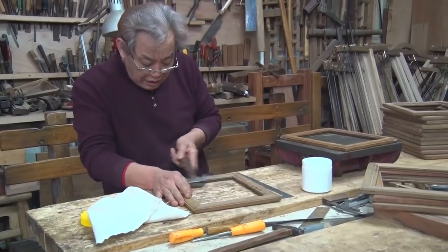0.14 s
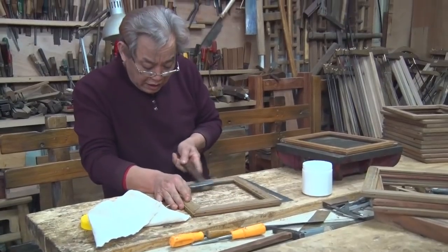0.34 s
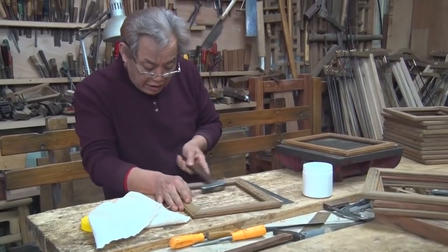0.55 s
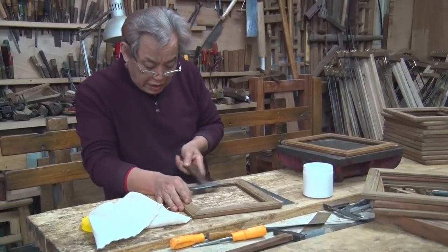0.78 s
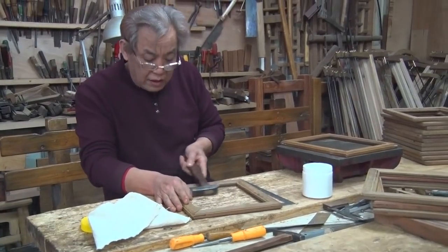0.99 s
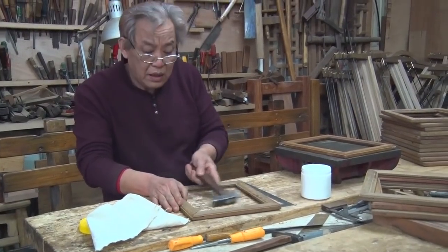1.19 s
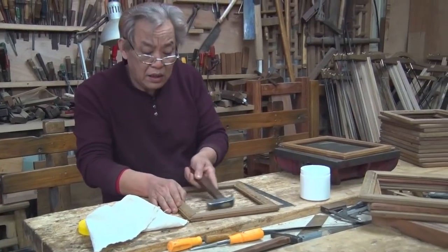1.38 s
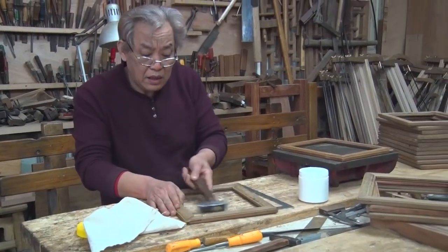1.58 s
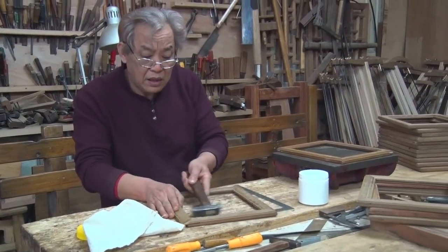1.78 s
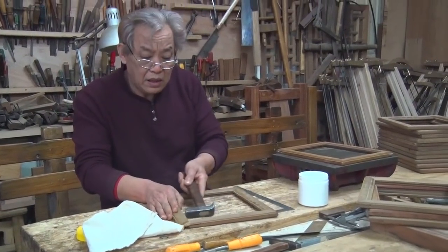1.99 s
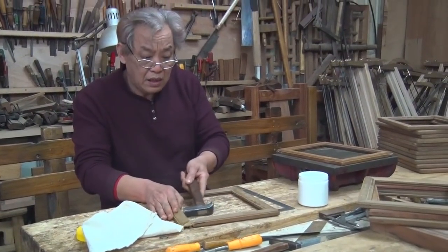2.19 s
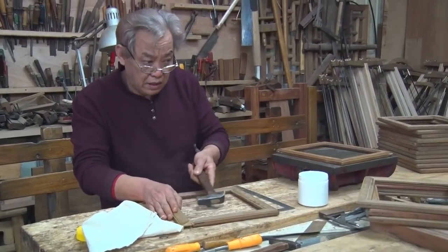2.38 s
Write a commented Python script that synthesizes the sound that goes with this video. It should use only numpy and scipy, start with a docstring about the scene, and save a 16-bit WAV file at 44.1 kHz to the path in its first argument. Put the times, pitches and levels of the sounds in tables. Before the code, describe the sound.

Quick, sharp hammer taps on wood pause briefly as the frame is shifted, then carry on

```python
"""A small hammer taps the corner joint of a wooden frame on a bench, about 4.5 times a second: crack plus frame modes.
A low rumble of the bench and faint room air, both shaped noise, run underneath from the start.
Dull knocks and brief scuffs fall between the taps: noise bursts, the knocks with bench modes.
Halfway the frame is shifted, knocks and clacks on the bench, and the taps go on at another spot.
A cluttered workshop returns each blow as echoes, scatter and tail to a near-mono microphone."""
import sys
import numpy as np
from scipy import signal
from scipy.fft import rfft, irfft
from scipy.io import wavfile
from scipy.ndimage import uniform_filter1d

SR = 44100
rng = np.random.default_rng(int(sys.argv[2]) if len(sys.argv) > 2 else 0)


def generate_wav(signal):
    """Clip the signal to [-1, 1] and save it as 16-bit WAV at the path in sys.argv[1]."""
    frames = np.transpose(np.atleast_2d(signal))
    scaled = np.clip(frames, -1, 1) * 32767
    pcm = np.round(scaled).astype(np.int16)
    wavfile.write(sys.argv[1], SR, pcm)


N = 108045

# spectrum of the crack of a hard contact on wood: hz, level_db
CRACK_SPECTRUM = [(80, -8), (170, 11.5), (350, -1.5), (650, 8), (1100, 17), (1750, 15.5), (2800, 13.5),
                  (3600, 13), (4500, 11), (5500, 13.5), (7400, 1.5), (8400, 5), (10200, -3.5), (10900, 1),
                  (11700, -28)]
CRACK_RISE_S = 0.00079  # rise of every contact burst
TAIL_EDGE_HZ = 11100  # band limit of room tails, rumble and air


def amp(db):
    """Decibels to gain."""
    return 10 ** (np.asarray(db) / 20)


def read(points, hz):
    """Table value at hz, interpolated on a log-frequency axis."""
    table_hz, value = np.transpose(points)
    return np.interp(np.log(hz + 1), np.log(table_hz + 1), value)


def add(mix, start_s, sound):
    """Add sound to mix at start_s, which may lie before the start."""
    at = round(start_s * SR)
    sound = sound[:, max(-at, 0):]
    part = mix[:, max(at, 0):][:, :sound.shape[1]]
    part += sound[:, :part.shape[1]]


def colour(x, points, size=4096):
    """Causal minimum-phase filter with the given (hz, db) shape."""
    hz = abs(np.fft.fftfreq(size, 1 / SR))
    log_gain = np.log(amp(read(points, hz)))
    response = np.exp(np.conj(signal.hilbert(log_gain)))
    impulse = np.fft.ifft(response).real[:size // 2]
    return signal.fftconvolve(x, impulse)[:len(x)]


def low_pass(x, edge_hz):
    """Steep linear-phase band limit."""
    fir = signal.firwin(255, edge_hz, window=("kaiser", 7), fs=SR)
    return signal.oaconvolve(x, fir[None], "same", axes=1)


def burst(noise, t60_points, rise_s, even_hz, count=9):
    """Noise that swells and dies band by band; its spectrum is levelled to gain 1 over spans of even_hz."""
    t = np.arange(len(noise)) / SR
    hz = np.fft.rfftfreq(len(noise), 1 / SR)
    centres_hz = np.geomspace(80, 11000, count)
    spectrum = rfft(noise)
    decaying = np.zeros(len(t))
    for centre_hz, pick in zip(centres_hz, np.eye(count)):
        band = irfft(spectrum * read(np.c_[centres_hz, pick], hz), len(t))
        decaying += band * amp(-60 * t / read(t60_points, centre_hz))
    swelling = decaying * (1 - np.exp(-t / rise_s))
    spectrum = rfft(swelling, 2 * len(t))
    span_bins = max(int(2 * even_hz / hz[1]), 1)  # the padded bins are half as wide
    power = uniform_filter1d(abs(spectrum) ** 2, span_bins)
    return irfft(spectrum / np.sqrt(abs(power) + 1e-12))[:len(t)]


def ring(modes, t):
    """Decaying sines from rows of (hz, level_db, t60_s); neighbouring rows start in opposite phase."""
    out = np.zeros(len(t))
    for k, (hz, level_db, t60_s) in enumerate(modes):
        out += (-1) ** k * amp(level_db - 60 * t / t60_s) * np.sin(2 * np.pi * hz * t)
    return out


def workshop(direct, spread, size=24000):
    """Direct sound plus near echoes; spread is convolved with quick scatter and a late tail, both decaying noise."""
    # room: hz, level_db, late_t60_s
    room = np.array([(70, 12, 0.95), (191, 4, 0.3), (500, 6, 0.34), (1043, -5.5, 0.55), (1750, -4, 0.47),
                     (4100, -5, 0.45), (5170, -12, 0.23), (6300, -10, 0.48), (10400, -17, 0.083)])
    # bench and nearby shelves: delay_s, gain
    echoes = [(.0046, 0.18), (.0093, 0.28), (0.015, 0.11)]
    # left-right difference: hz, level_db
    width = [(1200, -25), (5000, -18)]
    early_db, early_t60_s = 1.5, 0.15
    late_db = -4
    delay_s, rise_s = 0.0046, 0.0042

    def tail():
        early = burst(rng.standard_normal(size), [(1000, early_t60_s)], rise_s, even_hz=150)
        late = burst(rng.standard_normal(size), room[:, [0, 2]], rise_s, even_hz=79.5)
        return colour(amp(early_db) * early + amp(late_db) * late, room[:, :2])

    out = np.zeros((2, size + len(direct)))
    mid, side = tail(), tail()
    tails = mid + np.outer([1, -1], colour(side, width))
    reverb = signal.fftconvolve(spread[None], tails, axes=1)
    add(out, delay_s, low_pass(reverb, TAIL_EDGE_HZ))
    add(out, 0, direct[None])
    soft = colour(direct, [(3000, -3.5), (8000, -9)])
    soft = soft + np.outer([-1, 1], 2 * colour(direct, width))
    for echo_s, gain in echoes:
        add(out, echo_s, gain * soft)
    return out


def hammer(size=8192):
    """A tap is a short crack plus the frame's modes, coloured by where and how the head lands; it may rebound."""
    # taps: start_s, level_db, spot (0 first, 1 second), favoured_hz, lift_db, then tone_db at each of tone_hz
    taps = [(-.022, -7.5, 1, 6300, 3, 4, 0.5, 3, 5.5, 4, 0, 3, 2),
            (0.21, -3, 0.019, 1716, 9.2, 12, 3, 5, -0.5, 6.5, 1, 2, 6.5),
            (0.432, 0, 0.0097, 847, 3.8, 4, -4, -1.5, 1.5, 2, 0, -2, 4),
            (0.661, 2, 0.11, 1240, 5.5, -3.5, 3.5, -5, -1, 3, 0, -1, 1.5),
            (0.8766, -1, 0.089, 614, 7.4, -7, 0.5, -5, 2, 3, -0.5, -2, 0),
            (1.2983, -2, 0.87, 1750, 6.8, 5.5, 8.5, -4, 2, -1, -3.5, -1.5, 1.8),
            (1.5223, -0.5, 0.39, 3570, 4.2, 4, 1, -9, 5, -2, -3.5, -2.5, 2),
            (1.7464, -3.5, 0.91, 6350, 7.8, 1.5, 3, -1.5, 3, 2.5, 5.5, -3, 5),
            (1.9675, -2.5, 0.95, 4100, 2.2, 1, -1.5, -3, 0.5, 2.5, 2, 2, 2.5),
            (2.153, -7.5, 0.63, 1375, 7.2, 7.5, -0.5, -1, 0.5, 6.5, 0.5, -2.5, -1.8)]
    tone_hz = [250, 650, 1000, 1500, 2500, 4000, 6300, 9500]
    # frame modes: hz, t60_s, first_spot_db, second_spot_db
    frame = [(449.8, 0.23, -36, -36), (578, 0.06, -36, -26.5), (703.5, 0.078, -21, -27),
             (986, 0.039, -16.5, -38), (1318, 0.19, -36.5, -35), (1375, 0.02, -10, -32),
             (1603, 0.076, -22.5, -25), (1670, 0.032, -37.5, -21), (1832, 0.042, -19.5, -15.5),
             (2130, 0.028, -21, -29), (2325, 0.18, -36.5, -41.5), (2564, 0.15, -29, -51.5),
             (3670, 0.011, -20, -14.5), (4143, 0.038, -34, -18.5), (6300, 0.018, -27, -14.5)]
    # crack decay: hz, t60_s
    crack_t60 = [(300, 0.044), (2000, 0.046), (5000, 0.014), (11000, 0.013)]
    # the head drops back on the wood: start_s, level_db relative to the tap
    rebounds = [(1.5405, -8)]
    lift_octaves = 0.18  # half-width of the favoured resonance
    crack_in_room, ring_in_room_db = 0.45, -11

    out, t = np.zeros((2, N)), np.arange(size) / SR
    hz = np.geomspace(20, SR / 2, num=300)
    click = colour(1. * (t == 0), CRACK_SPECTRUM)
    for start_s, level_db, spot, favoured_hz, lift_db, *tone_db in taps:
        noise = rng.standard_normal(size)
        crack = colour(burst(noise, crack_t60, CRACK_RISE_S, even_hz=350), CRACK_SPECTRUM)
        modes = [(f, first + spot * (second - first), t60) for f, t60, first, second in frame]
        wood = ring(modes, t)
        direct = crack + wood
        spread = crack_in_room * crack + np.sqrt(1 - crack_in_room ** 2) * click
        spread += amp(ring_in_room_db) * wood
        lift = lift_db * np.exp(-(np.log2(hz / favoured_hz) / lift_octaves) ** 2)
        shape_db = read(np.c_[tone_hz, tone_db], hz) + lift
        shape = np.c_[hz, shape_db]
        add(out, start_s, amp(level_db) * workshop(colour(direct, shape), colour(spread, shape)))
        for again_s, again_db in rebounds:
            if start_s < again_s < start_s + t[-1]:
                softer = np.c_[hz, shape_db - 10 * np.log10(1 + (hz / favoured_hz / 2) ** 2)]
                again = workshop(colour(direct, softer), colour(spread, softer))
                add(out, again_s, amp(level_db + again_db) * again)
    return out


def steady(spectrum):
    """Noise of unit RMS with the given (hz, db) spectrum."""
    x = colour(rng.standard_normal(N + SR), spectrum)[SR:]  # drops the filter's onset
    return x / x.std()


def bench_rumble():
    """Low rumble of the bench under the hands: mono shaped noise with a drifting level."""
    # spectrum: hz, level_db
    spectrum = [(25, -47), (75, 0), (130, 8), (170, 10), (260, 4.5), (420, -10.5), (3000, -39.5)]
    # level: time_s, level_db
    level = [(0, -39), (1.0, -43.5), (1.11, -51), (1.348, -41.5), (1.899, -45.5), (2.101, -50),
             (2.281, -39.5), (2.45, -70)]
    level_db = np.interp(np.arange(N) / SR, *np.transpose(level))
    return steady(spectrum) * amp(level_db)


def room_air():
    """Faint shaped noise, independent left and right."""
    # spectrum: hz, level_db
    spectrum = [(25, 3), (200, 10), (1000, -8), (11000, -3.5)]
    return amp(-80.5) * np.array([steady(spectrum), steady(spectrum)])


def scuffs(size=8192):
    """The frame slips a little under the hand: short band-passed noise bursts."""
    # scuffs: start_s, level_db
    slips = [(0.177, 4.5), (0.633, -2), (1.457, 7)]
    band_hz, t60_s, in_room_db = (510, 970), 0.037, -7.5
    out = np.zeros((2, N))
    band = signal.butter(2, band_hz, "bandpass", fs=SR, output="sos")
    for start_s, level_db in slips:
        noise = burst(rng.standard_normal(size), [(500, t60_s)], CRACK_RISE_S, even_hz=148)
        scuff = signal.sosfilt(band, noise)
        add(out, start_s, amp(level_db) * workshop(scuff, amp(in_room_db) * scuff))
    return out


def knocks(size=8192):
    """Frame and hands meet the bench: a noise thud plus bench modes, the softer the contact the duller."""
    # knocks: start_s, level_db, dull_above_hz
    contacts = [(0.181, 0.5, 500), (0.633, -6.5, 350), (0.71, -2, 350), (0.839, -4.5, 300),
                (0.938, -12, 480), (1.04, -12.5, 444), (1.1325, -2, 714), (1.153, -3.5, 480),
                (1.2409, 6, 1110), (1.412, -6.5, 605), (1.4605, -6.5, 300), (1.614, -5.5, 300),
                (1.668, -9, 446), (1.859, -12, 460), (2.171, -12, 600)]
    # bench modes: hz, level_db, t60_s
    bench = [(157.8, -30, 0.15), (212.3, -19.5, 0.043), (395, -28.5, 0.05), (707, -28.5, 0.098)]
    # thud spectrum: hz, level_db
    thud_spectrum = [(80, 2), (180, 18), (310, 7.5), (520, 12), (1500, 5.5), (8000, 4)]
    thud_t60_s, dull_order, in_room_db = 0.065, 2.63, -7.5
    out, t = np.zeros((2, N)), np.arange(size) / SR
    hz = np.geomspace(20, SR / 2, num=40)
    for start_s, level_db, dull_hz in contacts:
        noise = burst(rng.standard_normal(size), [(500, thud_t60_s)], CRACK_RISE_S, even_hz=154.3)
        thud = colour(noise, thud_spectrum)
        softness = np.c_[hz, -10 * np.log10(1 + (hz / dull_hz) ** (2 * dull_order))]
        knock = colour(thud + ring(bench, t), softness)
        add(out, start_s, amp(level_db) * workshop(knock, amp(in_room_db) * knock))
    return out


def clacks(size=8192):
    """The frame's hard edge meets the bench: noise bursts with the crack spectrum."""
    # clacks: start_s, level_db
    edge_hits = [(1.151, -39), (1.2433, -21)]
    t60_s = 0.065
    out = np.zeros((2, N))
    for start_s, level_db in edge_hits:
        noise = burst(rng.standard_normal(size), [(500, t60_s)], CRACK_RISE_S, even_hz=400)
        clack = colour(noise, CRACK_SPECTRUM)
        add(out, start_s, amp(level_db) * workshop(clack, clack))
    return out


def scene():
    """Sum of taps, bench contacts, rumble and air."""
    contacts = hammer() + scuffs() + knocks() + clacks()
    return contacts + low_pass(bench_rumble() + room_air(), TAIL_EDGE_HZ)


def record(dry):
    """The microphone's low cut, then the band limit."""
    low_cut = signal.butter(2, 205, "highpass", fs=SR, output="sos")
    return low_pass(signal.sosfilt(low_cut, dry), edge_hz=11600)


dry = scene()
out = record(dry)
generate_wav(out)
```